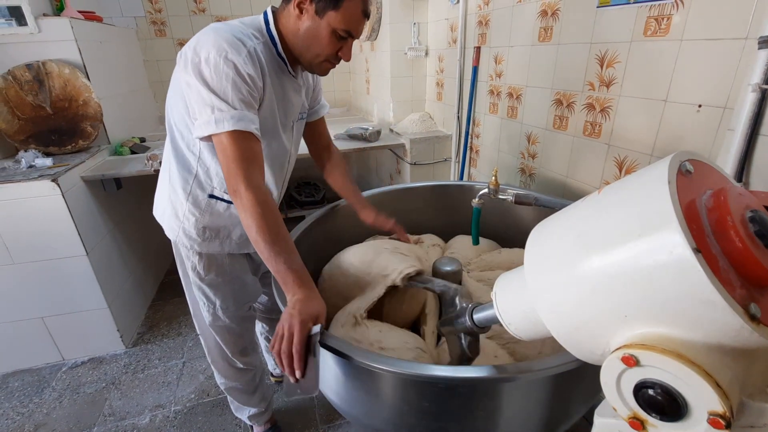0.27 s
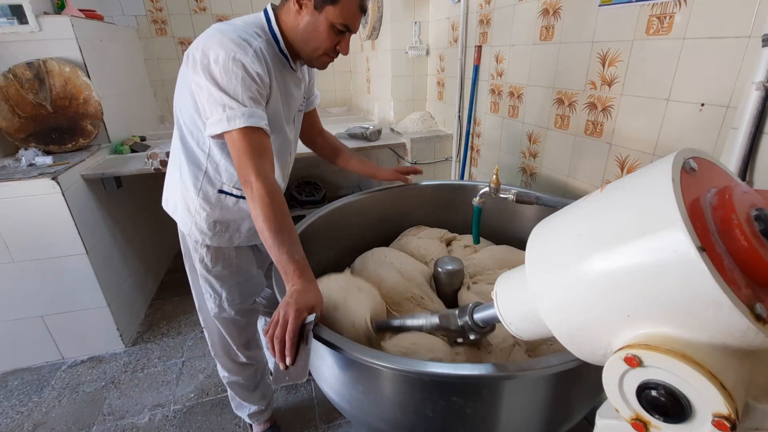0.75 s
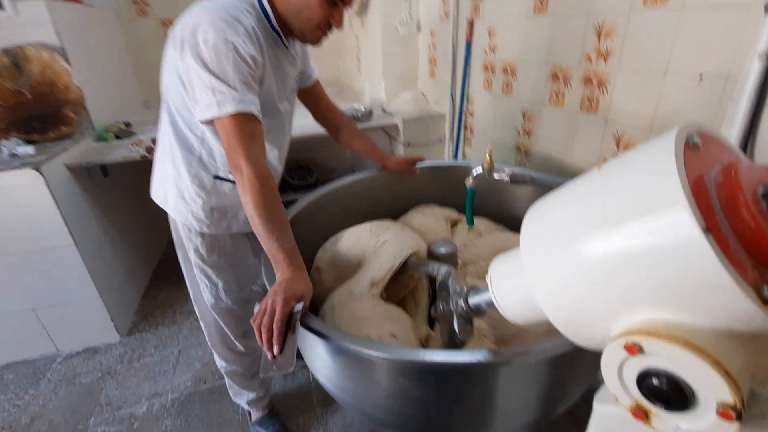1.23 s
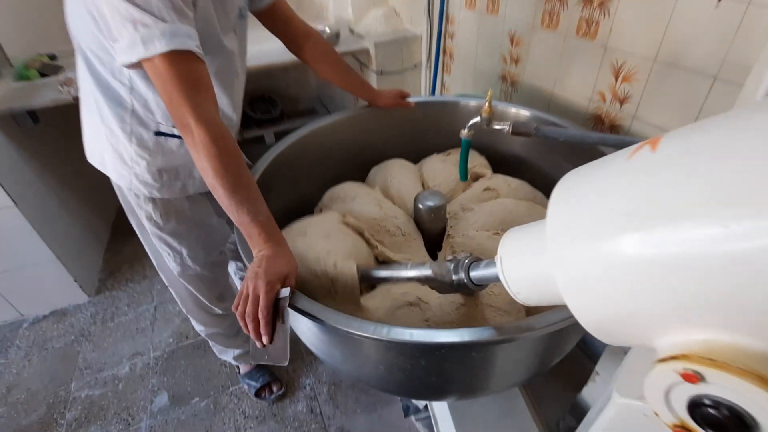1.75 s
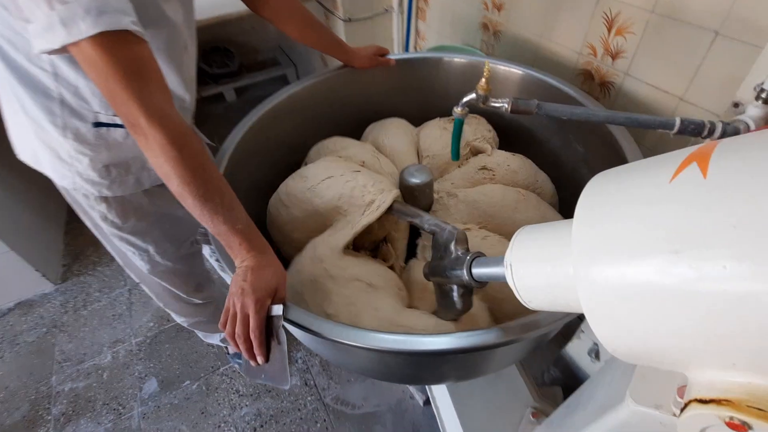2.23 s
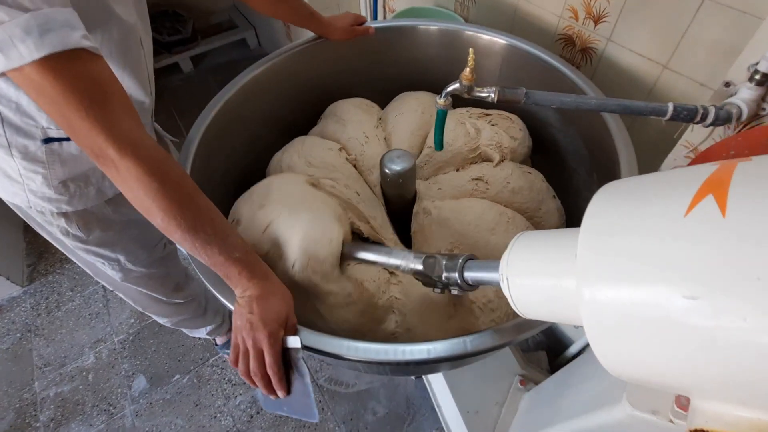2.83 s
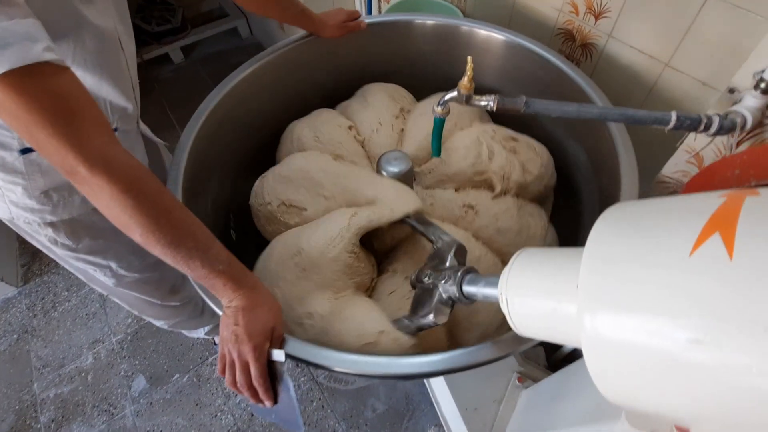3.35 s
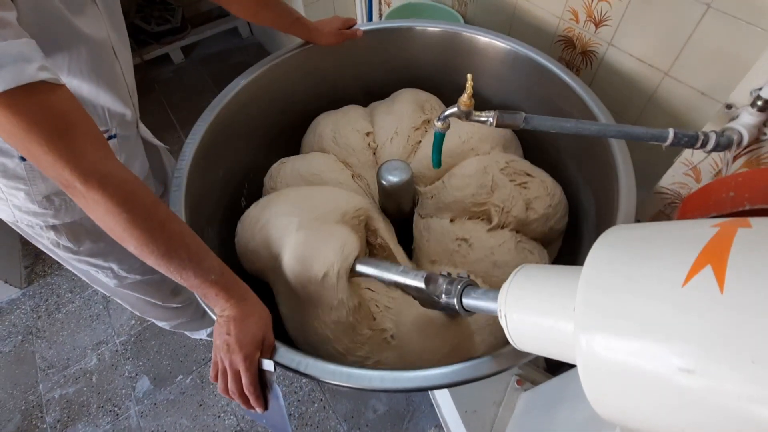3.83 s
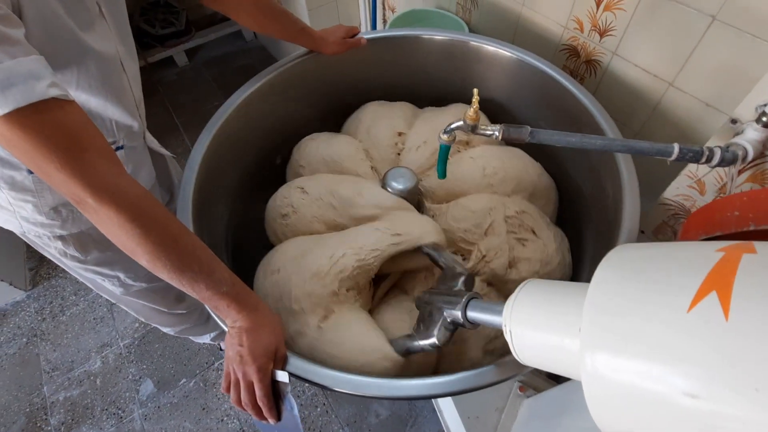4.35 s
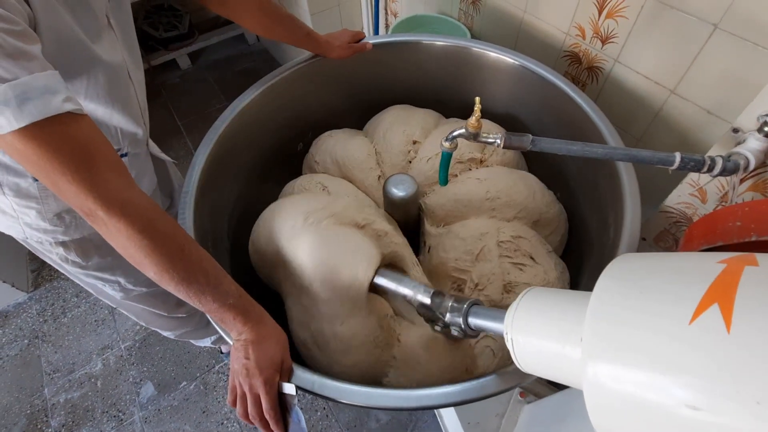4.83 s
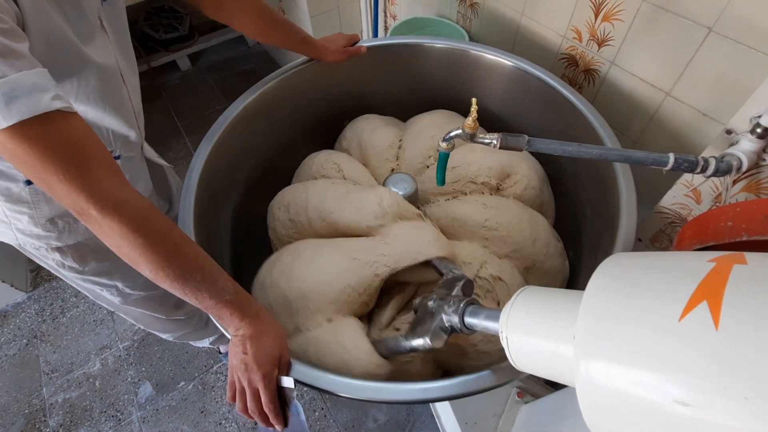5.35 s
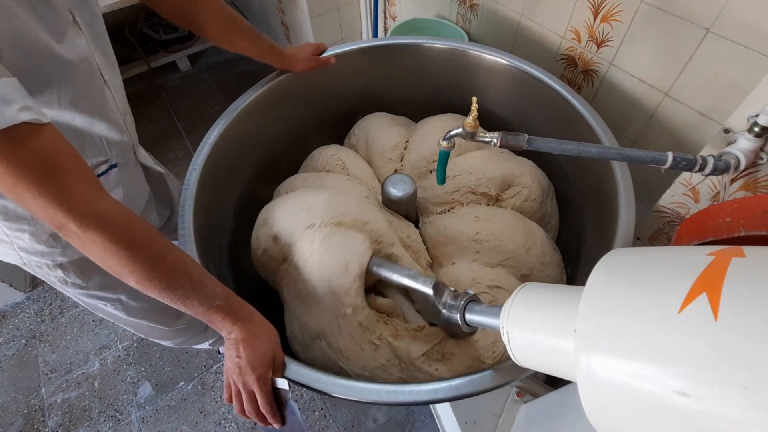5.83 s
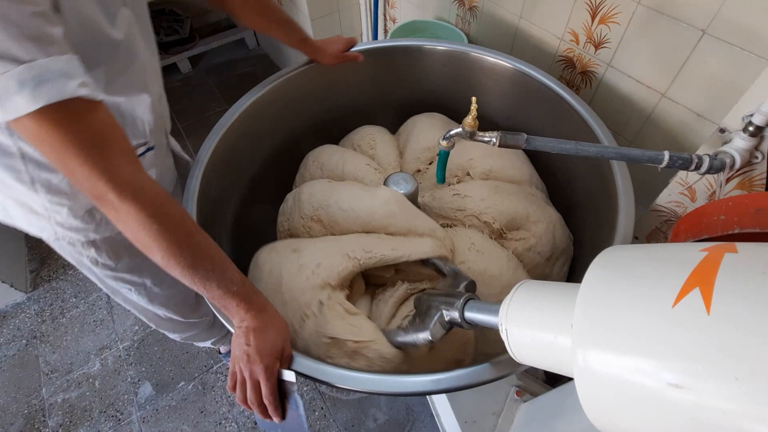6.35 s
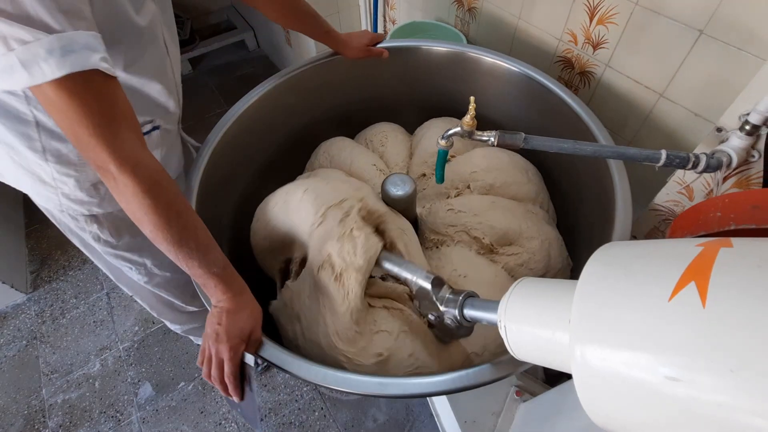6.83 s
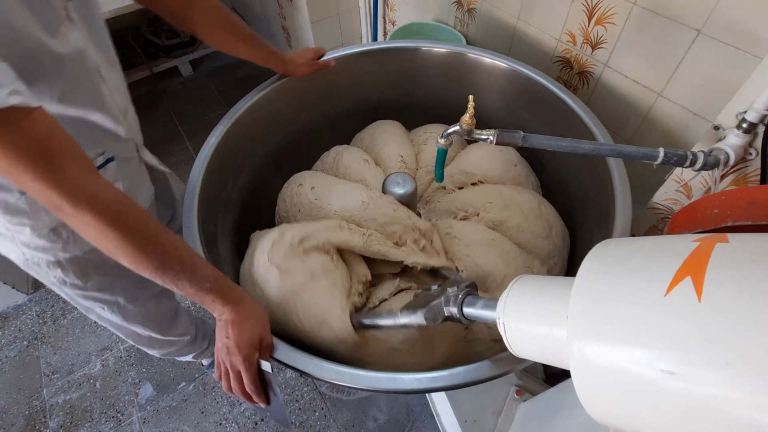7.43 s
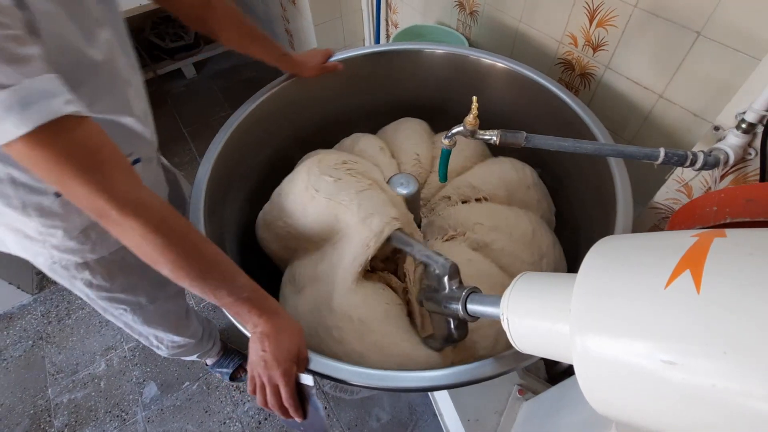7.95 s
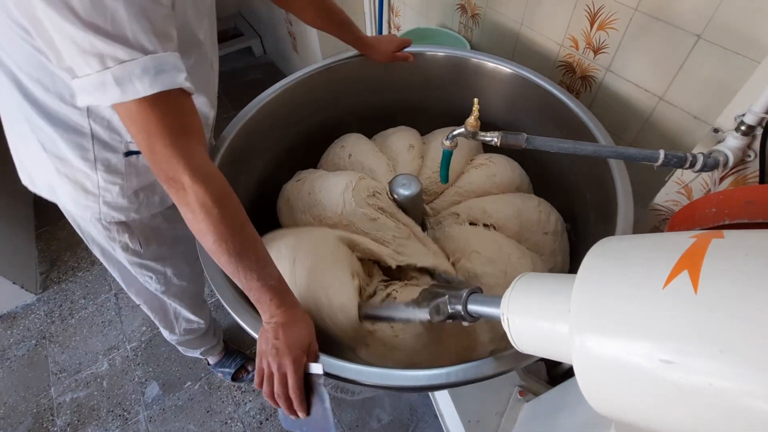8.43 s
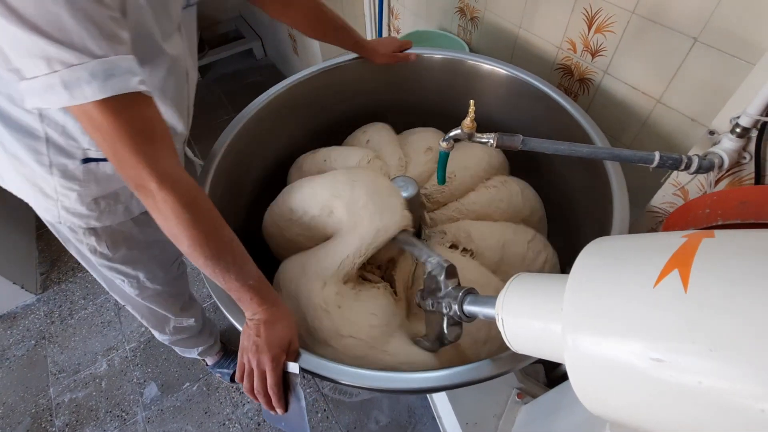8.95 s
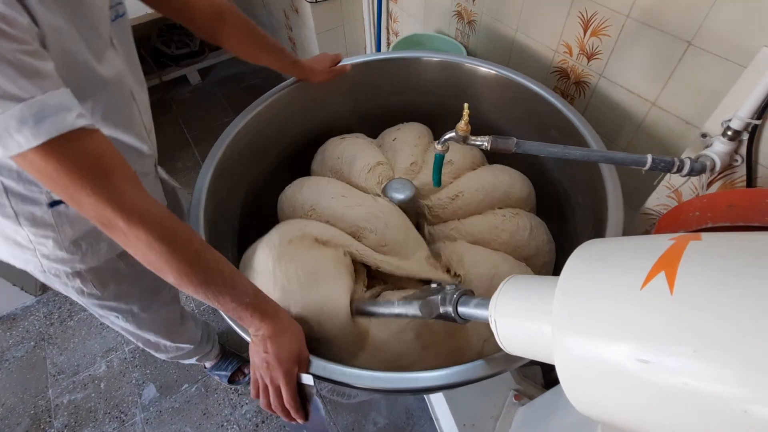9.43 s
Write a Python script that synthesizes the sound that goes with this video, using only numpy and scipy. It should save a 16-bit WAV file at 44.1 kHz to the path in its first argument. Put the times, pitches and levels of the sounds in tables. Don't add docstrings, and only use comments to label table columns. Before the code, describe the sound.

Steady electric motor drone with a thin wavering whine and gear rumble, broken by low metallic-frame knocks and faint hisses of peeling dough.

```python
import sys
import numpy as np
from scipy import signal
from scipy.io import wavfile

SR = 44100
rng = np.random.default_rng(int(sys.argv[2]) if len(sys.argv) > 2 else 0)


def volts_from_db(level):
    exponent = np.asarray(level, float) / 20
    return 10 ** exponent


def inscribe(sig):
    pcm = np.round(np.clip(np.atleast_2d(sig).T, -1, 1) * 32767)
    wavfile.write(sys.argv[1], SR, pcm.astype(np.int16))


N = 426888

HUM_HZ = 99.8
SLOT_LEAD = 1.9

# time in seconds, level in dB, left-right difference in dB.
HUM_PATH = [(0, -23.5, 3), (.2, -41.5, -30), (.45, -27.5, 4), (.85, -41.5, -26), (1.6, -35.5, 0),
            (1.9, -51, -38), (2.45, -32.5, 6), (2.8, -48.5, -32), (3.05, -34.5, -10), (3.43, -41, -9),
            (3.7, -30, 1), (4.3, -34, 0), (4.6, -26.5, 0), (4.9, -26.5, 0), (5.19, -29.5, 0),
            (5.44, -25, 1), (5.6, -31.5, -10), (5.7, -28, 1), (6.4, -28, -1.5), (6.8, -26, 0),
            (6.9, -34, -9), (7.25, -28, 4), (7.6, -27.5, -0.5), (7.97, -31.5, 0.5), (8.7, -27.5, 0.5),
            (8.77, -34.5, -8), (8.93, -25.5, 1), (9.38, -31, 2), (9.68, -25, 1)]
# multiple of the hum frequency, level in dB.
HUM_HARMONICS = [(5, -58), (6, -47), (7, -53), (8, -51)]
# time in seconds, main slot tone in Hz.
ROTOR_SPEED = [(0, 1914), (.8, 1923), (1.2, 1918), (2.1, 1917), (2.6, 1924), (3, 1916), (4, 1915),
               (5.4, 1914), (6.3, 1915), (7.2, 1910), (7.5, 1915), (8, 1912), (8.5, 1918), (9.1, 1909),
               (9.5, 1916), (9.68, 1913)]
# height in seconds, length in seconds, level in dB.
MAIN_SLOT_CRESTS = [(.2, 0.47, -40), (0.976, 0.17, -46.5), (0.752, 0.27, -50), (1.64, 0.55, -43.5),
                    (2.12, 0.25, -46), (2.273, 0.16, -43), (2.4, 0.16, -36.5), (2.72, 1, -45),
                    (3.2, 0.34, -43), (3.54, 0.47, -40), (4.006, 0.29, -41.5), (4.567, 0.24, -43.5),
                    (4.88, .25, -46), (5.184, 0.34, -46), (5.634, 0.22, -45), (5.887, 0.081, -44.5),
                    (6.114, 0.35, -40), (6.553, 0.45, -42.5), (6.966, 0.49, -40.5), (7.553, 0.42, -42.5),
                    (7.95, 0.45, -44), (8.487, 0.55, -39), (8.994, 0.33, -42.5), (9.224, 0.21, -43),
                    (9.55, 0.52, -39.5)]
# height in seconds, length in seconds, level in dB.
LOWER_SLOT_CRESTS = [(.2, 0.93, -42.5), (.95, 0.6, -41.5), (1.695, 0.54, -37.5), (2.103, 0.45, -43),
                     (3.0, 0.27, -43), (3.45, 0.62, -40), (4.45, 0.88, -41.5), (5.52, 0.38, -39.5),
                     (6.2, 0.54, -48), (6.85, 0.98, -44), (9.4, 0.6, -49)]
# height in seconds, length in seconds, level in dB.
HIGHER_SLOT_CRESTS = [(.2, .4, -55), (1.6, .4, -56), (2.45, .5, -52), (3.35, .45, -46.5), (4.4, .5, -55),
                      (6.1, .4, -58), (6.9, .6, -55), (8.5, .4, -54)]
# height in seconds, length in seconds, level in dB.
PAIR_UPPER_CRESTS = [(1.5, 0.54, -50), (2.05, 0.35, -54), (3.5, 0.55, -55), (4.1, .5, -63), (4.75, 1, -47),
                     (5.3, 0.69, -46), (5.85, 0.37, -48.5), (6.4, 0.69, -50), (7.5, 0.69, -53),
                     (9.0, .65, -47)]
# height in seconds, length in seconds, level in dB.
PAIR_LOWER_CRESTS = [(0.148, 0.42, -52), (1.95, 0.36, -46.5), (2.5, 0.67, -53), (3.0, 0.37, -46.5),
                     (4.6, 2.9, -50), (6.5, 0.22, -47.5), (7.45, 0.61, -53.5), (8.95, 0.49, -49)]
TOOTH_MESH_HZ = (331, 548, 864.5)
# height in seconds, length in seconds, level in dB.
MESH_CRESTS = [
    [(2.55, 1, -42), (3.5, 0.56, -36), (4.3, 0.69, -35), (6.5, 0.34, -39)],
    [(.15, 0.65, -39), (2.5, 1, -34.5), (3.4, 1, -39.5), (4.85, 1, -39)],
    [(.1, .3, -45), (2.2, 0.57, -35), (2.9, 0.97, -41.5), (6.2, .5, -38)],
]
# frequency in Hz, level in dB.
GEAR_TONES = [(60, -43), (416, -52), (639, -53), (665, -54), (715, -54), (739.5, -46), (840, -52),
              (938, -52), (962, -56.5), (1112, -58), (3270, -69), (4365, -70), (4576, -70)]
# frequency in Hz, height in seconds, length in seconds, level in dB.
IDLER_TONES = [(785, 2.5, 4.4, -45.5), (840, 8.9, 3, -65), (920, 3.2, 6.5, -62), (1157, 4.6, 8.7, -50),
               (1301, 4.2, 6.5, -49.5), (1350, 7.1, 6.6, -62), (2214, 1.9, .3, -57),
               (2070, 0.69, 0.61, -55), (4780, 9.0, .4, -62), (4780, 7.8, 4.6, -65),
               (5730, 1.15, 0.22, -67.5), (4390, 0.65, 1.9, -60), (4576, 0.22, 0.67, -60),
               (4576, 2.6, 2.9, -62), (4576, 8.75, 0.56, -56)]
# time in seconds, level in dB, lead of the right side in radians.
WHINE_PATH = [(0, -35.5, -0.5), (.3, -38.5, -1.5), (1.2, -39.5, 0.5), (1.38, -39, 4.5), (2, -40.5, 0.5),
              (2.3, -43.5, 8.5), (2.75, -37, 1), (3.25, -37, 4), (3.95, -38.5, 4), (4.35, -37, 1),
              (4.75, -39, 4), (5, -36.5, 1.34), (5.75, -39.5, 2.5), (6.1, -38.5, 2), (8, -39.5, 3.5),
              (8.45, -37.5, 1.3), (9.2, -38.5, 2.5), (9.36, -32.5, 3), (9.68, -40.5, 5)]
# time in seconds, level in dB.
DRIVE_LOAD = [(0, -51.5), (.9, -55.5), (1.9, -58), (2.9, -53), (3.4, -56), (4, -52.5), (4.6, -55),
              (4.95, -54), (5.75, -55.5), (6, -54), (6.6, -56), (8.5, -58), (9, -55), (9.68, -56)]
# frequency in Hz, density in dB per Hz.
RUMBLE_SPECTRUM = [(18, -49), (30, -13), (50, -14), (75, -6), (102, -7), (125, -6.5), (189, -16),
                   (249, -17), (304, -8), (461, -15), (741, -12.5), (830, -13.5), (1030, -17.5),
                   (1290, -18.5), (1600, -22), (1950, -31.5), (2110, -20), (2580, -32.5), (3400, -54),
                   (4420, -61), (7480, -120)]
# frequency in Hz, density in dB per Hz.
RUB_SPECTRUM = [(2200, 12), (3000, 5), (4000, 3), (5500, -1.5), (6500, -1.5), (7800, -8)]
# frequency in Hz, density in dB per Hz.
HISS_SPECTRUM = [(7900, -14), (8500, -3.5), (9200, -5.5), (10000, -8), (11000, -7.5), (12500, -11),
                 (14000, -3), (15000, -3), (16200, -8)]
# frequency in Hz, density in dB per Hz.
DEEP_SPECTRUM = [(26, -20), (38, 11), (60, 6.5), (85, 19), (110, 15.5), (140, -22)]
# frequency in Hz, density in dB per Hz.
UPPER_SPECTRUM = [(70, -13.5), (110, 1), (150, -8), (220, -9.5), (320, -5.5), (450, -17), (600, -19)]
# height in seconds, peak in dB, length in seconds.
PEEL_STROKES = [(.45, -63, 1), (1.5, -62.5, 0.78), (2.55, -58, 0.54), (3.41, -59, 0.52),
                (4.278, -58.5, 0.54), (5.228, -58, 0.59), (6.047, -60, 0.64), (7.226, -59.5, 0.58),
                (8.135, -62.5, 0.46), (9.16, -56.5, 0.53)]
# start in seconds, peak in dB, length in seconds, centre in Hz.
AIR_PUFFS = [(.203, -40.5, 0.025, 3280), (.203, -51, .025, 4730), (.2, -49, .035, 6000),
             (0.444, -56, 0.032, 5000), (0.554, -47, .03, 4000), (2.664, -48, 0.075, 4230),
             (2.74, -49, 0.1, 5800), (2.79, -45, 0.073, 6400), (3.96, -54, .1, 4200),
             (4.87, -47, 0.087, 4380), (5.315, -48, .04, 5700), (5.47, -50, .04, 5400),
             (5.824, -51, 0.061, 4470), (6.426, -56, 0.036, 9050), (7.137, -43, 0.21, 1700),
             (7.135, -52, 0.047, 2650), (7.15, -47, 0.19, 2070), (7.142, -34, 0.11, 770),
             (8.8, -53, .1, 4700), (8.95, -54, .1, 4200), (9.274, -51, 0.1, 5000),
             (9.275, -51, 0.087, 4150), (9.28, -52, .1, 5970), (9.294, -45, 0.072, 2750)]
# start in seconds, peak in dB.
DOUGH_TICKS = [(0.0942, -50), (0.2054, -36), (0.4594, -39), (2.7794, -38), (3.0969, -60), (3.7389, -45),
               (4.6877, -44), (5.3253, -37), (6.4213, -37), (6.7695, -49), (7.7523, -48), (9.2994, -47)]
# time in seconds, level in dB.
SCRAPER_SQUEAL = [(2.85, -60), (2.885, -46), (2.91, -52), (2.935, -41.5), (2.96, -49), (2.978, -45),
                  (2.99, -47), (3.01, -41), (3.04, -49), (3.08, -53), (3.11, -58), (3.15, -52), (3.25, -56)]
# frequency in Hz, level in dB.
RIM_MODES = [(3065, 0), (3390, -3), (2550, -16), (3180, -10)]
# height in seconds, length in seconds, deep level in dB, upper level in dB.
FRAME_JOLTS = [(0.113, 0.41, -31, -31.5), (0.506, 0.76, -30, -40), (0.874, 0.18, -47, -32),
               (1.002, 0.037, -41, -27.5), (1.144, 0.17, -24.5, -38.5), (1.6, 0.51, -39, -44.5),
               (1.76, 0.23, -39, -34.5), (2.127, 0.25, -34, -51), (2.394, 0.28, -39, -36.5),
               (2.67, 0.15, -39, -32), (3.027, 0.24, -26, -33.5), (3.58, 0.32, -36, -50),
               (4.094, 0.79, -51, -58), (4.548, 0.37, -59, -43), (4.953, 0.13, -44, -49),
               (5.72, 0.34, -28, -39.5), (6.15, 0.68, -36, -50), (6.64, 0.2, -39, -36),
               (6.91, 0.99, -27, -41.5), (7.309, 0.12, -34, -28), (7.44, 0.11, -18, -29),
               (7.61, 0.22, -26.5, -40), (8.202, 0.24, -40, -54), (8.634, 0.61, -30, -63),
               (9.096, 0.89, -30, -50), (9.44, 0.24, -26, -33.5), (9.582, 0.1, -19.5, -50)]
# start in seconds, peak in dB, pitch in Hz, T60 in seconds, left-right difference in dB.
FRAME_THUDS = [(0.012, -9.5, 104, 0.052, 1), (0.038, -9, 122, .05, 0), (0.087, -8, 94.5, 0.041, -4),
               (0.101, -8, 318, 0.039, 3), (0.164, -16, 210, 0.048, 2), (0.186, -8, 118, 0.034, -3),
               (.198, -12, 190, 0.033, 4), (0.456, -30, 114, 0.04, 4), (0.802, -10, 165, 0.034, 4),
               (0.869, -10.5, 147, 0.068, -2), (0.889, -9, 119, 0.035, 3), (.866, -17, 350, 0.046, 5),
               (.921, -24, 310, .025, 0), (.77, -8, 110, .03, -7), (0.989, -4, 129, 0.049, -4),
               (1.018, -15.5, 330, .03, -4), (1.028, -14.5, 405, 0.018, 11), (1.084, -13, 108, 0.078, 0),
               (1.668, -15, 310, 0.046, 3), (1.709, -17, 317, 0.056, -2), (2.536, -15, 306, 0.089, -7),
               (2.694, -10, 327, 0.066, -6), (2.746, -20, 360, 0.047, 10), (2.626, -15, 311, 0.11, -5),
               (2.972, -12, 258, 0.023, 0), (3.02, -11.5, 117, 0.12, 3), (3.084, -15, 141, 0.046, 2),
               (5.616, -16, 159, 0.15, 7), (4.868, -22, 392, .03, 0), (6.557, -18, 524, .02, 3),
               (6.562, -13, 150, 0.043, 0), (6.639, -15, 150, .025, 2), (6.572, -8.5, 333, 0.045, -11),
               (7.246, -9, 104.6, 0.28, 1), (7.282, -18, 210, 0.06, 2), (7.426, -14, 125, 0.07, -1),
               (7.465, -11, 118, 0.056, 1), (7.494, -15, 105, 0.044, 10), (9.372, -8, 300, 0.065, -7),
               (9.467, -11, 117, 0.07, -1), (9.524, -22, 114, 0.067, -8)]
# frequency in Hz, coherence from 0 to 1.
SIDE_LIKENESS = [(40, 0.7), (100, 0.88), (200, .8), (430, 0.79), (600, 1), (950, 0.13), (1500, 0.17),
                 (2600, 0.24), (3300, 0.09), (16000, 0)]
# frequency in Hz, lag in samples.
LEFT_LAGS = [(40, 0), (450, 1), (700, 7), (1400, 14), (16000, 14)]
# frequency in Hz, left-right difference in dB.
NOISE_PANS = [(40, 1), (300, 1.5), (600, 1.5), (1300, 0), (2800, -1.9), (6000, 1), (11000, 7), (16000, -10)]


def rms_one(x):
    return x / np.sqrt(np.mean(x ** 2) + 1e-20)


def in_time(rows):
    s, *columns = np.transpose(rows)
    return [np.interp(np.arange(N) / SR, s, c) for c in columns]


def at_hz(points, hz):
    points = np.array(points)
    return np.interp(np.log(hz), np.log(points[:, 0]), points[:, 1])


def drift(rate):
    r = np.exp(-80 * np.pi * rate / SR)
    slow = signal.lfilter([1], [1, -2 * r, r * r], rng.standard_normal(N // 40 + 4002))[4000:]
    return np.interp(np.arange(N) / 40, np.arange(len(slow)), rms_one(slow - slow.mean()))


def panned(x, pan_db, hz):
    left = np.roll(x, round(at_hz(LEFT_LAGS, hz)))
    return np.array([left * volts_from_db(pan_db / 2), x * volts_from_db(-pan_db / 2)])


def banded_noise(spectrum, patchy_db, rate, near=1):
    low, top = spectrum[0][0], min(spectrum[-1][0], 17000)
    edges = low * 2 ** np.arange(0, np.log2(top / low) + 1 / 6, 1 / 3)
    out, white = 0, rng.standard_normal((2, 3, N))
    for k, (a, b) in enumerate(zip(edges, edges[1:])):
        centre = np.sqrt(a * b)
        band = signal.butter(2, [a, b], "band", fs=SR, output="sos")
        both, left, right = signal.sosfilt(band, white[k % 2])
        alike = np.clip(near * at_hz(SIDE_LIKENESS, centre), 0, 1)
        side_db = at_hz(NOISE_PANS, a) * np.array([[.5], [-.5]])
        gain = volts_from_db(at_hz(spectrum, centre) + patchy_db * drift(rate) + side_db)
        own = np.sqrt(1 - alike) * np.array([left, right])
        out = out + gain * (np.sqrt(alike) * panned(both, 0, a) + own)
    return rms_one(out)


def tone(hz, scatter, rate, lead=None):
    turn = np.exp(2j * np.pi * (np.cumsum(hz + np.zeros(N)) / SR + rng.random()))
    if lead is None:
        lead = 2 * np.pi * np.mean(hz) * at_hz(LEFT_LAGS, np.mean(hz)) / SR
    scatter = np.clip(scatter, 0, 1)
    paths = np.array([drift(rate) + 1j * drift(rate) for side in range(2)])
    direct = np.exp(.5j * lead * np.array([[-1], [1]]))
    return ((np.sqrt(2 - 2 * scatter) * direct + np.sqrt(scatter) * paths) * turn).real


def ring(clicks, hz, t60):
    r, w = volts_from_db(-60 / (max(t60, .005) * SR)), 2 * np.pi * hz / SR
    return signal.lfilter([0, np.sin(w)], [1, -2 * r * np.cos(w), r * r], clicks + 1e-18)


def swells(still_db, s, length, db, order=2):
    t = np.arange(0, N, 50) / SR
    offset = 2 * (t - s[:, None]) / length[:, None]
    bells = volts_from_db(2 * db)[:, None] * np.exp(-2 * np.abs(offset) ** order)
    return np.interp(np.arange(N) / SR, t, np.sqrt(volts_from_db(2 * still_db) + bells.sum(axis=0)))


def crests(rest_db, rows):
    return swells(rest_db, *np.transpose(rows), order=4)


def idlers():
    out = 0
    for hz, s, length, db in IDLER_TONES:
        out = out + crests(db - 10.5, [(s, length, db)]) * tone(hz, 0.25, 3.5)
    return out


def gears():
    return sum(volts_from_db(db + 1.5 + 1.5 * drift(.8)) * tone(hz, .4, 6) for hz, db in GEAR_TONES)


def fan():
    return volts_from_db(-66) * tone(11210, 0.81, 22)


def mesh():
    rest_db, scatters, rates = (-55.5, -48, -82), (.6, .8, .4), (14.0, 25.0, 8.0)
    out = 0
    for hz, db, rows, scatter, rate in zip(TOOTH_MESH_HZ, rest_db, MESH_CRESTS, scatters, rates):
        gain = volts_from_db(3.5 * drift(0.75) - 2.0) * swells(db, *np.transpose(rows))
        out = out + gain * tone(hz, scatter, rate)
    return out


def hum():
    level_db, pan_db = in_time(HUM_PATH)
    out = volts_from_db(level_db + pan_db * [[.5], [-.5]]) * tone(HUM_HZ, 0.0014, 0.33)
    out += volts_from_db(-43 + 1.5 * drift(5.0)) * tone(3 * HUM_HZ, 0.39, 1.36)
    return out + sum(volts_from_db(db) * tone(k * HUM_HZ, .4, 2) for k, db in HUM_HARMONICS)


def slots():
    hz = in_time(ROTOR_SPEED)[0] + 1.75 * drift(8.6)
    main = tone(hz, .07, 18, SLOT_LEAD)
    lower = tone(hz - HUM_HZ + 2.5, .08, 18, SLOT_LEAD)
    higher = tone(hz + HUM_HZ + 3, .2, 10, SLOT_LEAD)
    out = volts_from_db(4.0) * crests(-58, MAIN_SLOT_CRESTS) * main
    out += volts_from_db(-1.0) * crests(-55, LOWER_SLOT_CRESTS) * lower
    out += crests(-61, HIGHER_SLOT_CRESTS) * higher
    pair_hz, pair_rest_db, pair_lead = hz * 1.3855, -56.5, -1.3
    out += crests(pair_rest_db, PAIR_UPPER_CRESTS) * tone(pair_hz, .45, 28, pair_lead)
    return out + crests(pair_rest_db, PAIR_LOWER_CRESTS) * tone(pair_hz - HUM_HZ, .45, 28, pair_lead)


def whine():
    cage_hz, cage_peak_s, side_hz = 8.7, .01, 280
    level_db, lead = in_time(WHINE_PATH)
    cage = np.cos(2 * np.pi * cage_hz * (np.arange(N) / SR - cage_peak_s))
    hz = 3.816 * in_time(ROTOR_SPEED)[0] + 4 * cage + 9 * drift(40)
    out = volts_from_db(level_db + 1.9 * cage) * tone(hz, 0.25, 33.5, lead)
    out += volts_from_db(level_db - 13.5 + 4 * cage) * tone(hz - side_hz + 6, 0.7, 29, lead)
    out += volts_from_db(level_db - 19 + 0.43 * cage) * tone(hz + side_hz, 1.0, 110, lead)
    octave = tone(2 * hz, .5, 30) + .6 * tone(2 * hz - side_hz, .5, 30)
    out += volts_from_db(level_db - 28) * octave
    return out * volts_from_db(-3.5 * np.array([[.5], [-.5]]))


def drive():
    load_db, = in_time(DRIVE_LOAD)
    rumble_db = -37 + .45 * (load_db - load_db.mean()) + 1.5 * drift(19)
    out = volts_from_db(rumble_db + 4.5) * banded_noise(RUMBLE_SPECTRUM, 1.3, 15.7)
    out += volts_from_db(load_db + 8.5) * banded_noise(RUB_SPECTRUM, 1.93, 21.0)
    return signal.sosfilt(signal.butter(8, 8050, fs=SR, output="sos"), out)


def peeling():
    s, db, length = np.transpose(PEEL_STROKES)
    return volts_from_db(4.0) * swells(-69.5, s, 1.78 * length, db) * banded_noise(HISS_SPECTRUM, 0.99, 6.8)


def puffs():
    out, air = np.zeros((2, N)), rng.standard_normal((2, N))
    t = np.arange(N) / SR
    for s, peak_db, length, hz in AIR_PUFFS:
        span = slice(round(s * SR), round((s + 2 * length) * SR))
        age = (t[span] - s) / length
        sos = signal.butter(1, [hz / 1.025, hz * 1.026], "band", fs=SR, output="sos")
        band = signal.sosfilt(sos, air[:, span])
        out[:, span] += volts_from_db(peak_db) * 4 * age * np.exp(1 - 4 * age) * rms_one(band)
    return out


def ticks():
    t, gain = np.arange(N) / SR, np.zeros(N)
    for s, db in DOUGH_TICKS:
        gain += volts_from_db(db - 7.0) * (t > s) * np.exp(-np.abs(t - s) / .004)
    bright = signal.butter(2, 3000, "high", fs=SR, output="sos")
    return gain * signal.sosfilt(bright, rng.standard_normal((2, N)))


def drag():
    start_s, length_s, from_hz, to_hz = 7.15, .11, 2200, 2480
    age = np.clip((np.arange(N) / SR - start_s) / length_s, 0, 1)
    return volts_from_db(-45) * np.sin(np.pi * age ** .6) * tone(from_hz + (to_hz - from_hz) * age, .8, 60)


def scraper():
    rim = sum(volts_from_db(mode_db) * tone(hz, .55, 60) for hz, mode_db in RIM_MODES)
    t = np.arange(N) / SR
    scraping = (t > SCRAPER_SQUEAL[0][0]) & (t < SCRAPER_SQUEAL[-1][0])
    return volts_from_db(in_time(SCRAPER_SQUEAL)[0]) * scraping * rim


def shaking():
    s, length, deep_db, upper_db = np.transpose(FRAME_JOLTS)
    deep = banded_noise(DEEP_SPECTRUM, 3.4, 15.0, near=0.72)
    upper = banded_noise(UPPER_SPECTRUM, 2.55, 30.0, near=0.074)
    out = volts_from_db(-2.5) * swells(-54, s, length, deep_db) * deep
    out += volts_from_db(4.5) * swells(-52.5, s, length, upper_db) * upper
    return out * volts_from_db(2.5 * drift(17.0))


def thuds():
    out = np.zeros((2, N))
    knock = volts_from_db(-11) * np.hanning(round(0.0042 * SR))
    for s, db, hz, t60, pan_db in FRAME_THUDS:
        cycles = np.arange(round(SR / 110)) * hz / SR
        push = np.hanning(len(cycles)) * np.cos(2 * np.pi * cycles)
        click = np.zeros(SR // 3)
        click[:len(push)] = push
        body = ring(click, hz, t60)
        body = body / np.abs(body).max()
        body[:len(knock)] -= knock
        short = knock[::2]
        upper = ring(np.pad(short, (0, len(body) - len(short))), 2.63 * hz, t60 / 2)
        body -= volts_from_db(-15.5) * upper / np.abs(upper).max()
        at = round(s * SR)
        out[:, at:at + len(body)] += panned(volts_from_db(db - 7.5) * body, pan_db, hz)[:, :N - at]
    return out


def scene():
    machine = idlers() + gears() + fan() + mesh() + hum() + slots() + whine() + drive()
    dough = peeling() + puffs() + ticks() + drag()
    return machine + dough + scraper() + shaking() + thuds()


def top_cut(x):
    return signal.sosfilt(signal.butter(12, 15785, fs=SR, output="sos"), x)


def record(dry):
    mix = signal.sosfilt(signal.butter(2, 40, "high", fs=SR, output="sos"), dry)
    return top_cut(mix)


dry = scene()
out = record(dry)
inscribe(out)
```